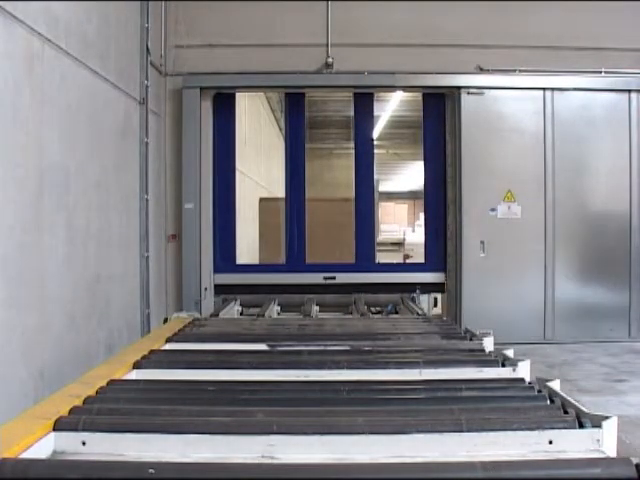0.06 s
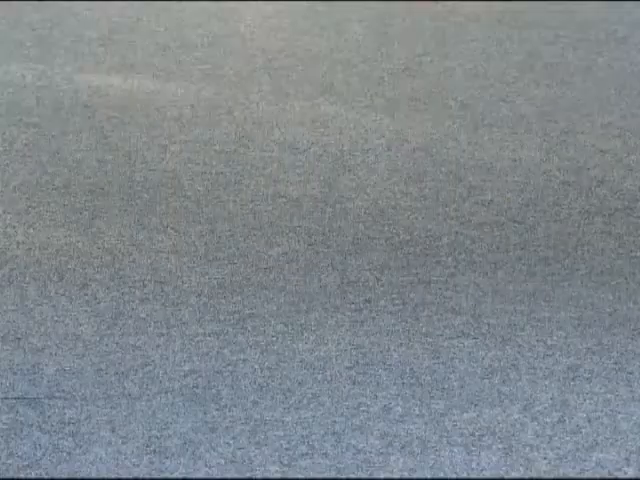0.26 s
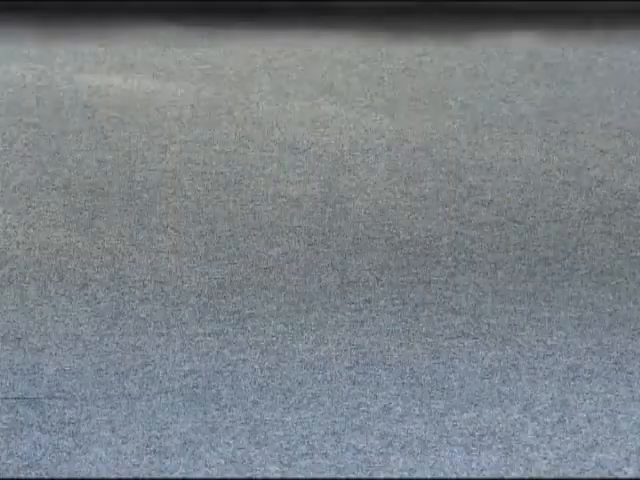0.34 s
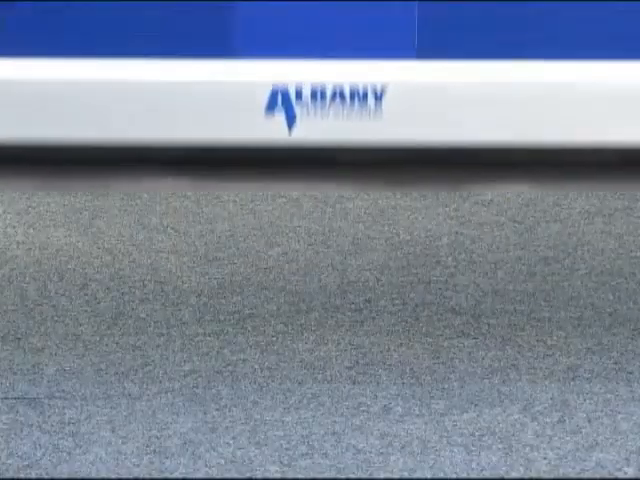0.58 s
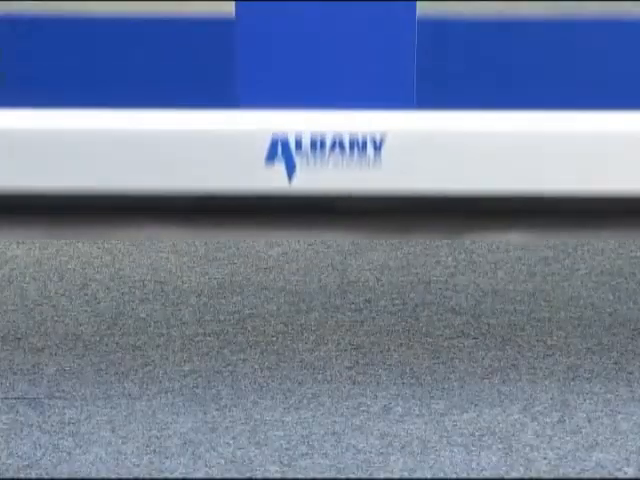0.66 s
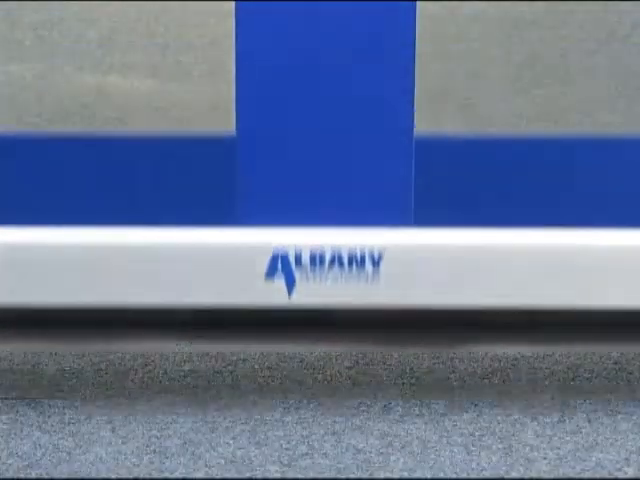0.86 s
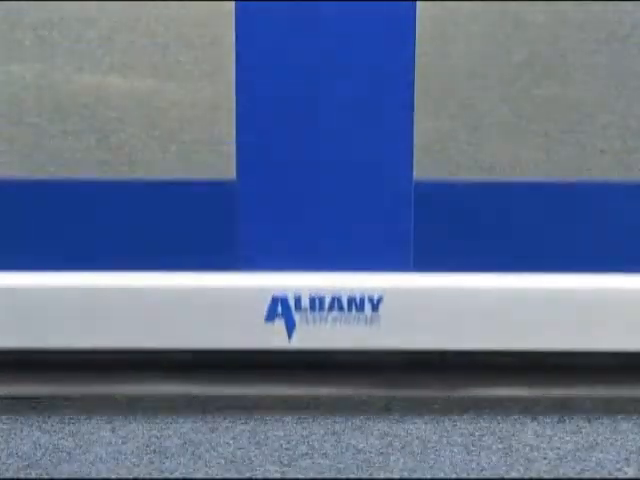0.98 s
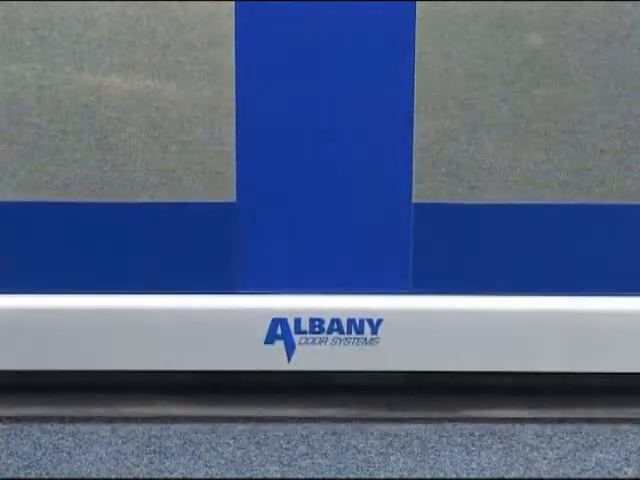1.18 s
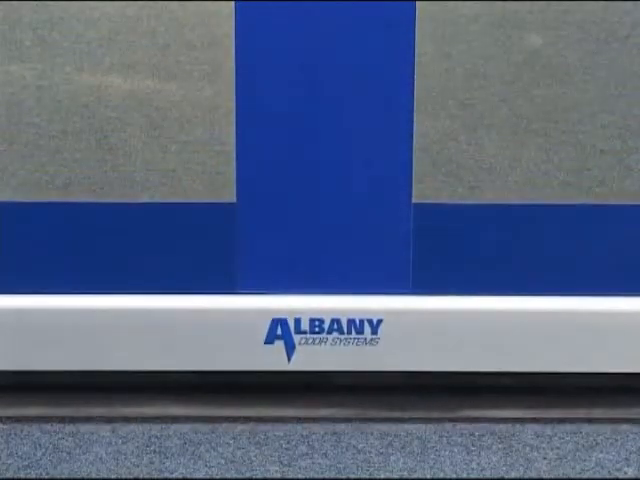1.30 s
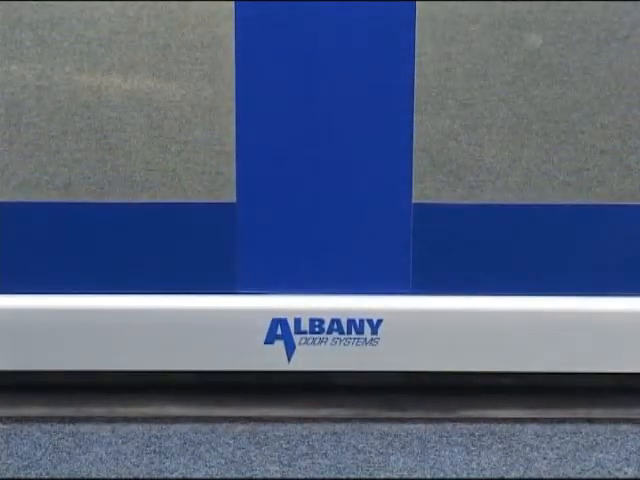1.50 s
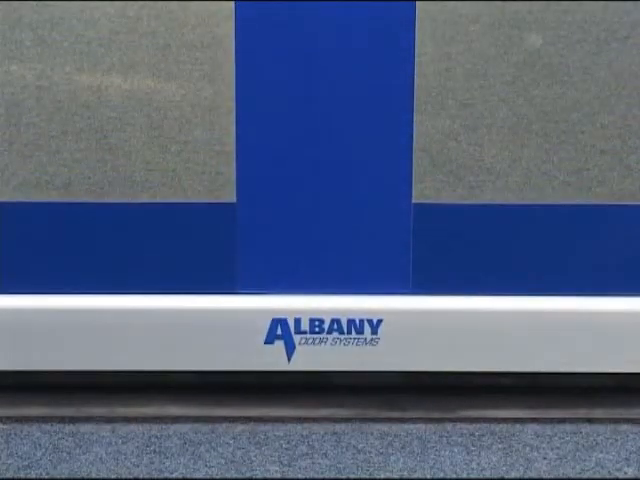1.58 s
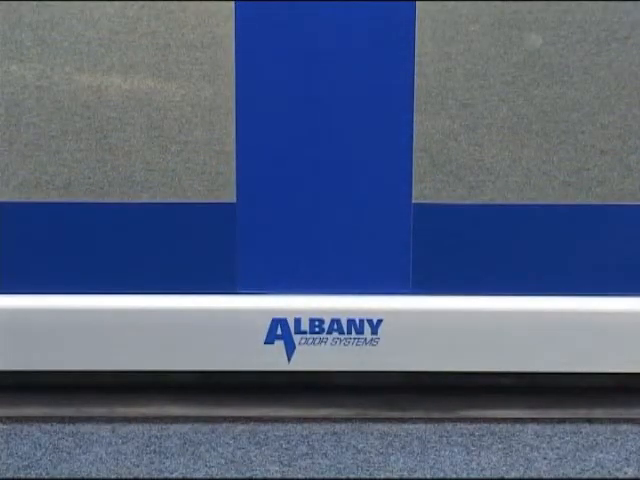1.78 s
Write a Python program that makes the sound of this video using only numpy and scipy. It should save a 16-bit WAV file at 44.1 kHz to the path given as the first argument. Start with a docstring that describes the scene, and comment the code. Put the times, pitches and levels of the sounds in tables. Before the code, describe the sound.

A fast roll-up door closes in a large hall, heard near the floor. After a short rasp at 0.2 seconds, it rolls and hisses over a humming motor and whining gears. It clacks at 0.7 seconds, then drones and judders as it brakes around 1 second. At 1.3 seconds its metal bottom bar thuds down, clatters and rings, fading by about 1.8 seconds over soft ventilation rumble.

```python
"""A short rasp comes first, then a fast roll door runs down in a large hall, heard from near the floor.
Its curtain (the sheet that closes the doorway) rolls and hisses through the side guides over a humming
motor and whining gears. It clacks, then drones and judders as it brakes. The metal bottom bar thuds on
the floor and rings into the hall, while the ventilation rumbles softly underneath."""
import sys
import numpy as np
from scipy import signal
from scipy.fft import rfft, irfft, next_fast_len
from scipy.io import wavfile
from scipy.ndimage import uniform_filter1d

SR = 44100
rng = np.random.default_rng(int(sys.argv[2]) if len(sys.argv) > 2 else 0)


def file_out(sig):
    """Save sig as 16-bit WAV at sys.argv[1]."""
    # one column per channel
    cols = np.atleast_2d(sig).T
    # limit, then scale
    lim = np.clip(cols, -1, 1)
    pcm = np.round(lim * 32767).astype(np.int16)
    wavfile.write(sys.argv[1], SR, pcm)


N = 81585


def amp(db):
    return 10 ** (np.asarray(db) / 20)


def times():
    return np.arange(N) / SR


def unit(x):
    """Scale a signal to an average power of 1."""
    return x / np.sqrt(np.mean(x ** 2) + 1e-20)


def curve(rows, column=1):
    """Loudness over time from a table's dB column, silent before the first row."""
    rows = np.array(rows)
    return amp(np.interp(times(), rows[:, 0], rows[:, column], left=-150))


def at_hz(points, hz):
    """Read between the rows of a frequency table, giving each octave equal room."""
    rows = np.array(points, float)
    return np.interp(np.log(np.maximum(hz, 1)), np.log(rows[:, 0]), rows[:, 1])


def wobble(per_second):
    """A smooth random wobble, about 1 in size."""
    hold = int(SR / per_second)
    steps = np.repeat(rng.standard_normal(N // hold + 1), hold)
    return unit(uniform_filter1d(uniform_filter1d(steps, hold), hold)[:N])


def colour(x, points):
    """Make some frequencies stronger and others weaker; white noise keeps its power."""
    size = 4096
    gains = unit(amp(at_hz(points, np.fft.rfftfreq(size, 1 / SR))))
    cepstrum = irfft(np.log(gains))
    # Folding this in half makes the filter ring only after a hit, never before.
    cepstrum[1:size // 2] *= 2
    cepstrum[size // 2 + 1:] = 0
    response = irfft(np.exp(rfft(cepstrum)))
    return signal.fftconvolve(x, response[None], axes=-1)[:, :N]


def gate(start, end, edge):
    """Fade in, hold and fade out; all times are in seconds."""
    return np.clip((times() - start) / edge, 0, 1) * np.clip((end - times()) / edge, 0, 1)


def burst(start, length, rise=.0028):
    """A blow rises quickly and dies away; all times are in seconds."""
    age = np.maximum(times() - start, 0)
    return np.minimum(age / rise, 1) * np.exp(-age / length)


# How wide the direct sound is. Each row: frequency in Hz, sides against centre in dB.
WIDTH = [(100, -10.5), (450, -8.5), (1100, -6), (2000, -2.5), (3300, 2), (5500, 0), (12000, 1.5)]

def spread(mid, side, width=WIDTH):
    """Make left and right from two unrelated signals: narrow bass, wide treble."""
    size = next_fast_len(N, True)
    side_gain = amp(at_hz(width, np.fft.rfftfreq(size, 1 / SR)))
    both = rfft(mid, size) + np.array([[1], [-1]]) * side_gain * rfft(side, size)
    return irfft(both / np.sqrt(1 + side_gain ** 2), size)[:, :N]


def noise(width=WIDTH):
    return spread(*rng.standard_normal((2, N)), width)


# The tone of the rasp. Each row: frequency in Hz, relative strength in dB.
RASP_COLOUR = [(40, -6), (280, -14), (520, -2), (1200, -3.5), (2100, -6), (2600, -3.5), (3400, -8),
               (5000, -22), (8000, -35), (13000, -71)]
# Pitches that ring in the rasp. Each row: pitch in Hz, width in Hz, relative level in dB.
RASP_PEAKS = [(1420, 28, 1), (1790, 31, -3), (2390, 35, 0), (2640, 69, -6)]
RASP_START_S, RASP_END_S = .1958, .234

def rasp():
    """A short, ringing scrape swells and stops dead."""
    swell = amp(19.5 * np.minimum((times() - RASP_END_S) / (RASP_END_S - RASP_START_S), 0))
    swell *= gate(RASP_START_S, RASP_END_S, edge=.0016)
    white = noise()
    peaks = sum(amp(db) * unit(signal.lfilter(*signal.iirpeak(hz, hz / width, SR), white))
                for hz, width, db in RASP_PEAKS)
    peaks = signal.sosfilt(signal.butter(2, 4000, fs=SR, output="sos"), peaks)
    return (amp(-35.5) * colour(white, RASP_COLOUR) + amp(-33.5) * unit(peaks)) * swell


# The tone of the moving air. Each row: frequency in Hz, relative strength in dB.
AIR_COLOUR = [(25, -2), (65, 3), (130, -4.5), (300, -7.5), (1000, -21), (3000, -23), (8000, -30),
              (13500, -34.5)]

def ventilation():
    """The hall's ventilation rumbles low, heard from the end of the rasp."""
    fade_in = np.clip((times() - RASP_END_S) / .02, 0, 1)
    return amp(-60) * colour(noise(), AIR_COLOUR) * fade_in


# How loud the curtain is. Each row: time in seconds, rolling in dB, hiss in dB.
CURTAIN_LEVELS = [(.235, -55, -58), (.265, -45.5, -52), (.39, -44.5, -52), (.66, -44, -52), (.77, -44, -56),
                  (.96, -43.5, -53), (1.12, -42.5, -54.5), (1.25, -49, -54.5), (1.4, -45.5, -57.5),
                  (1.55, -54.5, -68)]
# The tones of the rolling and the hiss. Each row: frequency in Hz, relative strength in dB.
ROLL_COLOUR = [(50, -22), (100, -14.5), (200, -4), (260, -5), (330, -1), (430, -2), (700, -5.5),
               (950, -3.5), (1200, -6), (1600, -10.5), (2600, -22), (5000, -53.5)]
HISS_COLOUR = [(600, -11), (2000, 1.5), (3200, -2), (5200, -1.5), (6500, -6), (8000, -11), (10500, -17),
               (13500, -26.5)]

def curtain():
    """The curtain rolls off its drum and hisses through the side guides."""
    roll = colour(spread(contacts(), contacts()), ROLL_COLOUR) * amp(.69 * wobble(39.03))
    hiss = colour(noise(), HISS_COLOUR) * amp(1.35 * wobble(59.5))
    return roll * curve(CURTAIN_LEVELS, column=1) + hiss * curve(CURTAIN_LEVELS, column=2)


def contacts(per_second=7000, scatter_db=1):
    """Thousands of tiny touches of uneven size blur into a rolling sound."""
    touches = rng.random(N) < per_second / SR
    return unit(touches * rng.standard_normal(N) * amp(scatter_db * rng.standard_normal(N)))


def drive_tone(hz, waver_db):
    """One tone of the gears, motor or judder; the more its level wavers, the more its pitch wanders."""
    wander_hz = 2.4 * waver_db * wobble(59.83)
    phase = 2 * np.pi * np.cumsum(hz + wander_hz) / SR
    return np.sqrt(2) * np.sin(phase) * amp(waver_db * wobble(55.44))


# Sliding tones. Each row: start and end in seconds, first and last pitch in Hz, level in dB. The early rows are
# the gears' whine and drone; from 0.975 s on they sound with the braking judder, falling as it slows.
SLIDING_TONES = [(.24, .72, 940, 905, -56), (.75, .89, 620, 680, -51.5), (.78, .91, 512, 506, -52),
                 (0.975, 1.06, 212, 190, -42), (1.014, 1.086, 468, 467, -45), (1.061, 1.147, 372, 366, -44),
                 (1.051, 1.3, 168, 114, -55.5)]

def sliding_tones():
    """The gears whine and drone as the door runs; low tones fall as the braking judder slows."""
    sound = 0
    for start, end, first_hz, last_hz, db in SLIDING_TONES:
        pitch = np.interp(times(), [start, end], [first_hz, last_hz])
        sound += drive_tone(pitch, waver_db=2.2) * amp(db) * gate(start, end, edge=.03)
    return sound


# The motor's note. Each row: time in seconds, pitch in Hz.
MOTOR_PITCH = [(.4, 303), (.8, 301), (.92, 309.3), (1.02, 317.5), (1.15, 301)]
# How loud it hums. Each row: time in seconds, level in dB.
MOTOR_LEVEL = [(.3, -60), (.42, -52), (.77, -52), (.85, -44.5), (1.02, -43.5), (1.12, -52), (1.3, -57),
               (1.7, -57.5)]

def motor():
    """The motor hums louder under the braking load, then softly as it holds the door."""
    pitch = np.interp(times(), *np.array(MOTOR_PITCH).T)
    return drive_tone(pitch, waver_db=2) * curve(MOTOR_LEVEL)


# Knocks in the guides. Each row: start in seconds, level in dB, rattle length in seconds.
CLACKS = [(0.66, -54, 0.026), (0.685, -38, 0.016), (0.693, -44, 0.021), (0.783, -52, 0.029),
          (0.985, -45, 0.016), (1.073, -50.5, 0.046), (1.09, -50, .018), (1.74, -56, .004),
          (1.796, -51, 0.0085)]
# Their tone. Each row: frequency in Hz, relative strength in dB.
CLACK_COLOUR = [(100, -19), (500, -21.5), (1200, -4), (2200, .5), (3700, -2.5), (5000, -8.5), (7000, -13),
                (9000, -30), (13000, -54)]

def clacks(hall):
    """Bright, rattling knocks come from the guides."""
    force = sum(amp(db) * burst(start, length) for start, db, length in CLACKS)
    return in_hall(colour(force * noise(), CLACK_COLOUR), hall, echo_db=-1)


# How long the echo lasts. Each row: frequency in Hz, seconds to fade by 60 dB.
HALL_DECAY = [(100, 1.45), (400, 1.16), (1000, 0.9), (2000, 1.09), (4500, 0.97), (7000, 0.26),
              (12000, 0.26)]
# How wide it is. Each row: frequency in Hz, sides against centre in dB.
HALL_WIDTH = [(100, -9), (500, -7.5), (1100, -6), (2000, -1.5), (3300, 2), (5500, 4.5), (12000, -3)]

def hall_echo(build_s=.004, left_db=-1):
    """The hall answers a click with a wash of echo whose highest tones die first."""
    hz, t, spectrum = signal.stft(noise(HALL_WIDTH), SR, nperseg=512)
    decay = amp(-60 * t / at_hz(HALL_DECAY, hz)[:, None])
    tail = signal.istft(spectrum * decay, SR)[1][:, :N]
    tail *= 1 - np.exp(-times() / build_s)
    return unit(tail) / np.sqrt(N) * amp(np.array([[left_db], [-left_db]]) / 2)


def in_hall(x, hall, echo_db):
    """A sound together with its echo."""
    return x + amp(echo_db) * signal.fftconvolve(x[:1], hall, axes=-1)[:, :N]


# How hard the curtain shakes. Each row: time in seconds, level in dB.
JUDDER_LEVEL = [(.975, -42), (.994, -40.5), (1.05, -40), (1.11, -44.5), (1.19, -46), (1.26, -59),
                (1.5, -78)]
# The tone of the shaking. Each row: frequency in Hz, relative strength in dB.
JUDDER_COLOUR = [(50, -30), (120, -13), (170, -3), (240, -3), (340, 1.5), (520, -1.5), (700, -11),
                 (1100, -13), (1600, -29.5), (5000, -54)]

def judder(hall, jolts_per_s=105.3):
    """The braking curtain sticks and slips in quick, uneven jolts."""
    gap_chance, size_chance = rng.standard_normal((300, 2)).T
    gaps_s = np.exp(.17 * gap_chance) / jolts_per_s
    starts = (np.cumsum(gaps_s) * SR).astype(int)
    jolts = np.bincount(starts, amp(-1.5 * size_chance), N)[:N]
    shaking = unit(jolts) * curve(JUDDER_LEVEL)
    return in_hall(colour(shaking[None], JUDDER_COLOUR), hall, echo_db=-6)


# The bar's blows on the floor. Each row: start in seconds, thud in dB, clatter in dB, length in seconds.
BLOWS = [(1.282, -34.5, -38.5, 0.013), (1.29, -43, -40, 0.027), (1.34, -49, -41, 0.0078),
         (1.384, -42, -67, 0.0095), (1.415, -41.5, -54, 0.0051)]
# The tones of the thud and the clatter. Each row: frequency in Hz, relative strength in dB.
THUD_COLOUR = [(40, -20), (120, -12), (200, -5), (300, -10), (620, -10.5), (780, 0), (900, 3), (1150, -1.5),
               (1420, -16), (1950, -10), (2800, -18.5), (8000, -53)]
CLATTER_COLOUR = [(300, -32), (1200, -8), (1600, -6), (2000, -1.5), (3050, -13), (3420, 3.5), (3800, -7),
                  (4200, 2), (4600, 2.5), (5300, -.5), (7000, -7), (8500, -15), (11500, -21.5),
                  (13500, -36)]
LANDING_S = BLOWS[0][0]

def bar_landing(hall):
    """The metal bottom bar thuds on the floor, clatters and settles."""
    push = sum(amp(db) * burst(start, length) for start, db, _, length in BLOWS)
    shake = sum(amp(db) * burst(start, length) for start, _, db, length in BLOWS)
    thud = in_hall(colour(push * noise(), THUD_COLOUR), hall, echo_db=-.5)
    clatter = in_hall(colour(shake * noise(), CLATTER_COLOUR), hall, echo_db=0)
    return thud + clatter


# The notes of the knock. Each row: pitch in Hz, relative level in dB, seconds to fade by 60 dB.
KNOCK_NOTES = [(205, -10, .1), (800, -3.5, .06), (885, -2, .08), (1950, -11, .07)]

def bar_knock():
    """The bar's first blow on the floor makes a short, hollow knock."""
    knock = 0
    for hz, db, fade_s in KNOCK_NOTES:
        note = np.sin(2 * np.pi * hz * (times() - LANDING_S))
        knock += amp(db) * note * burst(LANDING_S, fade_s / np.log(1000), rise=.004)
    return amp(-26) * knock


# The bar's own notes. Each row: pitch in Hz, relative level in dB, seconds to fade by 60 dB.
BAR_NOTES = [(770, -4, .8), (815, -2.5, .6), (841, -1.5, .9), (878, -1, .7), (953, -4, .7), (1001, -4, .8),
             (1104, -1.5, .95), (1231, -5, .9), (2401, -2.5, .65), (3391, -8, .9), (3470, -13, 1),
             (4345, -10, .46), (4622, -11, .5), (4990, -12, .53)]

def bar_ring():
    """The struck bar rings on with many notes, each wavering a little."""
    ring = 0
    for hz, db, fade_s in BAR_NOTES:
        phase = 2 * np.pi * (hz * times() + rng.random())
        ear_offsets = .6 * rng.standard_normal((2, 1))
        note = np.sin(phase + ear_offsets + .4 * wobble(25))
        ring += amp(db + 2.2 * wobble(25)) * note * burst(LANDING_S, fade_s / np.log(1000))
    return amp(-45.5) * ring


def scene():
    """The door runs down and lands over the hall's rumble, a little louder on the left."""
    hall = hall_echo()
    running = rasp() + curtain() + motor() + sliding_tones() + judder(hall) + clacks(hall)
    landing = bar_landing(hall) + bar_knock() + bar_ring()
    return (running + landing + ventilation()) * amp([[.75], [-.75]])


NARROW_START_S, NARROW_ABOVE_HZ, NARROW_DB = 1.105, 3750, -14.5
FADE_START_S, FADE_DB_PER_S, TOP_HZ = 1.647, 67.5, 13600

def record(dry):
    """Near the end the treble draws to the centre and all fades out; the very top is cut throughout."""
    side = (dry[0] - dry[1]) / 2
    side_treble = signal.sosfiltfilt(signal.butter(12, NARROW_ABOVE_HZ, "high", fs=SR, output="sos"), side)
    narrowing = (1 - amp(NARROW_DB)) * np.clip((times() - NARROW_START_S) / .016, 0, 1)
    narrowed = dry - np.array([[1], [-1]]) * narrowing * side_treble
    faded = narrowed * amp(-FADE_DB_PER_S * np.maximum(times() - FADE_START_S, 0))
    return signal.sosfilt(signal.ellip(10, .2, 70, TOP_HZ, fs=SR, output="sos"), faded)


dry = scene()
out = record(dry)
file_out(out)
```